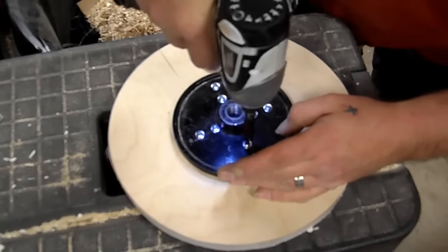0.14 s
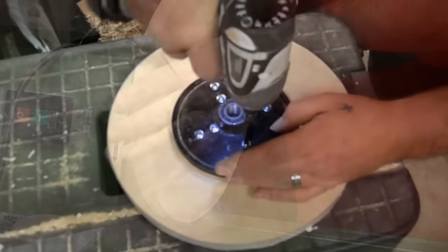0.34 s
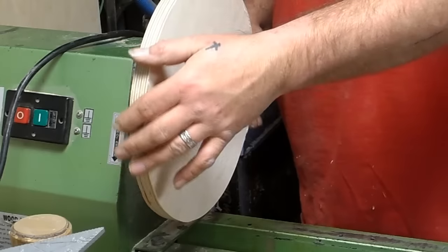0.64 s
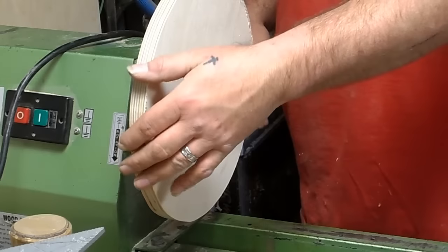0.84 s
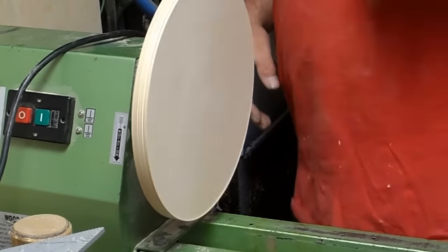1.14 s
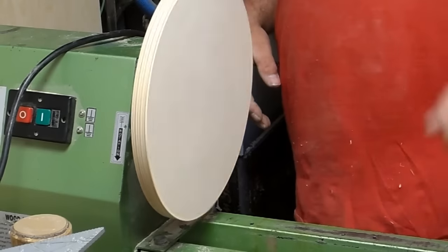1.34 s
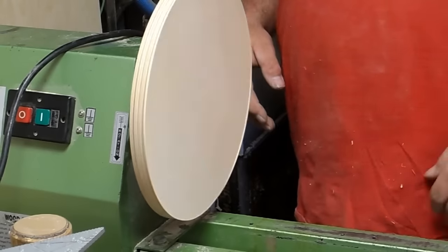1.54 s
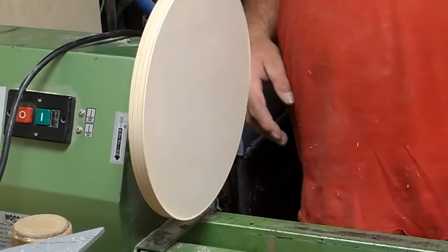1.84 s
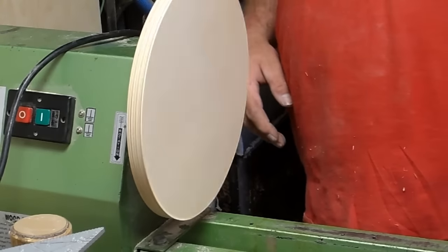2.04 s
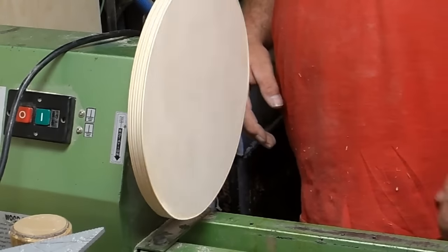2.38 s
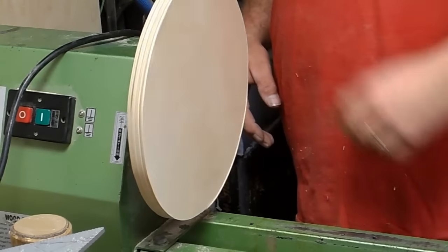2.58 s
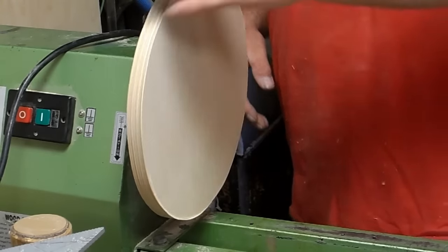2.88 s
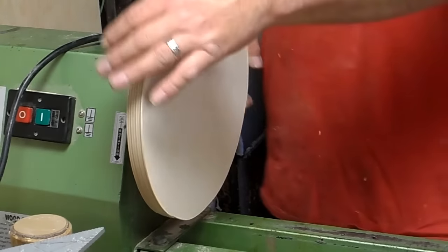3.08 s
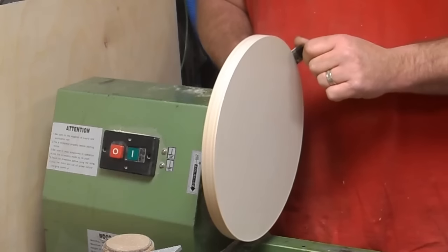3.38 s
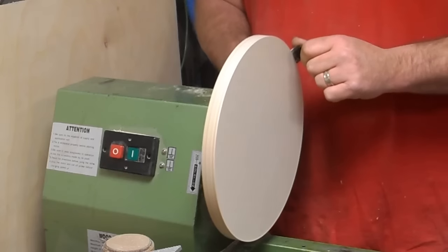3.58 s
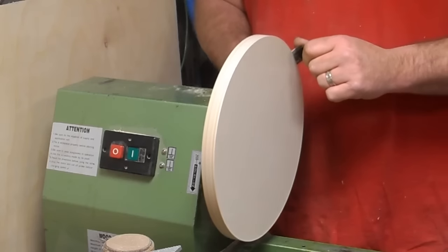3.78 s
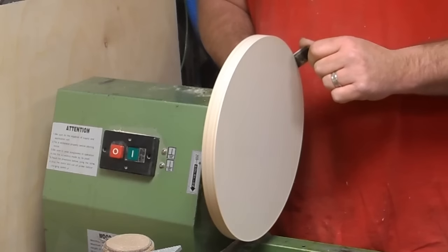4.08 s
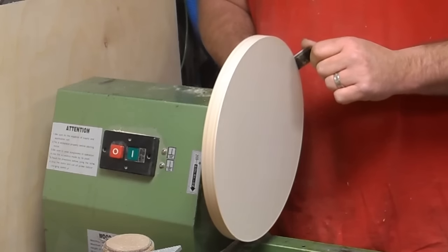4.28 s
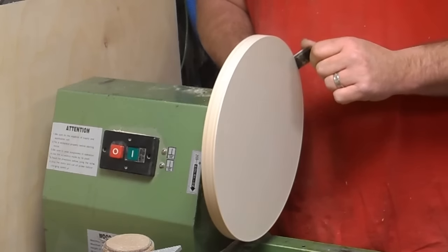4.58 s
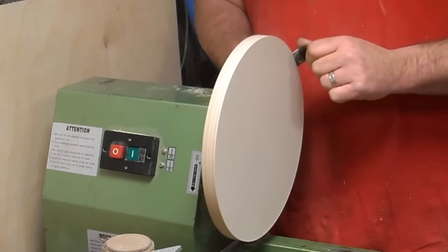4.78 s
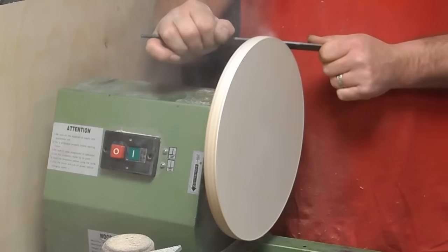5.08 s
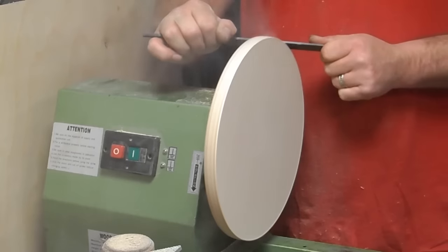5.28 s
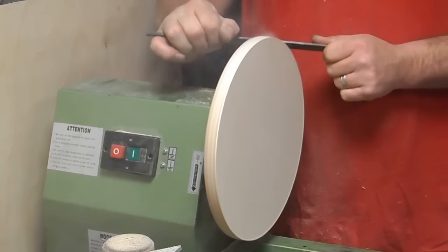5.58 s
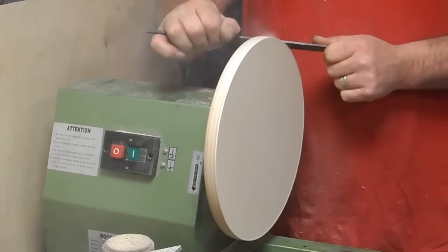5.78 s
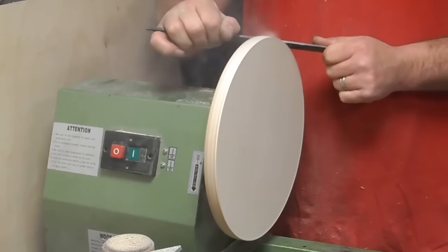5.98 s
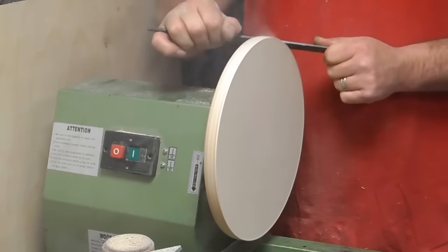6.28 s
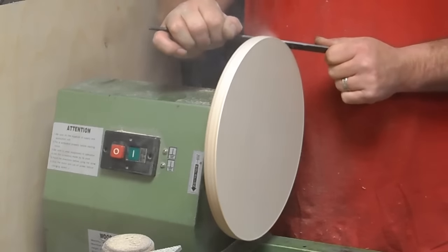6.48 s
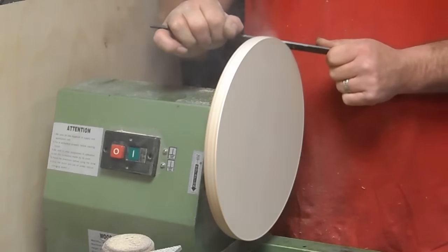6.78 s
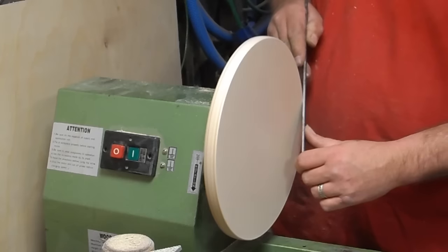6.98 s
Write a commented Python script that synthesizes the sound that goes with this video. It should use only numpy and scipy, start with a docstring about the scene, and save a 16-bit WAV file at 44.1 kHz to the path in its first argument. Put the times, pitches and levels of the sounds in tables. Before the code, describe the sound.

Last ratchety drill clicks, soft rumbling hand-spun plywood disc with bearing knocks, then three abrupt passages of harsh metal file rasping its spinning edge.

```python
"""Over room tone, a cordless drill runs down through its last clutch clicks: fading noise, bursts and a ringing chuck.
A hand then spins a plywood disc on a lathe: lumpy noise rings the frame, with bearing knocks and palm rubs.
Three passages of the powered disc follow, a file behind its rim, on top, then in front: the rim's bumps return
every turn, so the rasp is a comb of shaft orders that rings the disc, under fresh hiss from the file teeth."""
import sys
import numpy as np
from scipy import signal
from scipy.io import wavfile
from scipy.ndimage import uniform_filter1d

SR = 44100
rng = np.random.default_rng(int(sys.argv[2]) if len(sys.argv) > 2 else 0)


def field_ratio(decibels):
    """Amplitude ratio for a level in dB (20 dB per decade); scalars and array-likes work."""
    return 10 ** (np.asarray(decibels, dtype=float) / 20)


def int16_out(signal):
    """Quantize to a 16-bit WAV file."""
    q = np.round(np.clip(np.atleast_2d(signal).T, -1, 1) * 32767)
    wavfile.write(sys.argv[1], SR, q.astype(np.int16))


N = 314433
T = np.arange(N) / SR

# Spectra below give relative level per Hz; "per passage" lists hold behind, on top, in front.
# room tone spectrum [f/Hz, level/dB]
ROOM_SPECTRUM = [(12, -36), (20, 0.5), (59, -6.5), (145, -22.5), (203, -19.5), (375, -29.5), (1650, -36.5),
                 (3800, -41), (13000, -42.5), (15800, -45)]
ROOM_DB = -66.5
# room tone above the bass [t/s, level/dB]
ROOM_LEVEL = [(0, 6), (.256, -1), (.27, 4), (7.13, 0.5)]

# drill brush hiss, also the colour of the click cracks [f/Hz, level/dB]
DRILL_AIR = [(1180, -22), (2000, -24), (2160, -11), (4140, -8.5), (5950, -17), (13300, -8), (15800, -14)]
# drill housing buzz, also the colour of the click thumps [f/Hz, level/dB]
DRILL_BODY = [(40, -37), (95, 4.5), (200, -21), (440, -2), (800, -15.5), (1450, -12.5), (2500, -15.5),
              (4000, -40)]
# clutch clicks and small ticks [t/s, crack level/dB, housing thump level/dB]
CLICKS = [(0.0059, -26, -47), (0.0314, -31, -50), (0.0474, -38, -42), (0.0504, -28, -33.5),
          (0.059, -27, -48), (0.0856, -35, -42.5), (0.109, -39, -53), (0.182, -53, -75), (0.2452, -49, -62),
          (0.2665, -40.5, -58)]
# chuck metal that rings at each click [f/Hz, width/Hz, level/dB]
CHUCK = [(1660, 90, 5), (2100, 130, -2), (3680, 130, -3), (4996, 90, -8)]
CHUCK_OVER_CRACK_DB = 14
HISS_DB, HISS_HOLD_S, HISS_FADE_DB_PER_S = -44.5, 0.064, 245
BUZZ_DB, BUZZ_HOLD_S, BUZZ_FADE_DB_PER_S = -49, 0.054, 190

# spins by hand: start, stop, rise, bearing rumble, grit, release
# [t/s, t/s, t/s, level/dB, level/dB, slope/(dB/s)]
SPINS = [(0.253, 0.437, 0.031, -50, -65, 95), (1.17, 2.495, 0.027, -41, -49.5, 214)]
# lathe frame resonances [f/Hz, width/Hz, level/dB]
FRAME = [(140, 19, -14), (195, 12, 4.5), (226, 48, 1), (270, 66, -4), (349, 50, -15), (403, 104, -14.5)]
# bearing grit spectrum [f/Hz, level/dB]
GRIT = [(260, -32), (450, -9), (554, 3), (683, 2), (898, -9.5), (1420, -12.5), (2260, -24), (2630, -24),
        (3210, -23.5), (3910, -26.5), (5320, -29), (6200, -38), (8060, -75)]
# bearing whirr resonances [f/Hz, width/Hz, level/dB]
WHIRR = [(2570, 110, -1.5), (2754, 120, -1), (4100, 120, -6)]
WHIRR_OVER_GRIT_DB = -18
COAST_DB_PER_S = 6.5  # the coasting disc quietens
WOBBLE_DB, WOBBLE_HZ, WOBBLE_TOP_S = 2.5, 6.4, 1.46  # the rumble swells and sinks
LINGER_DB, GRIT_LINGER_DB, LINGER_DB_PER_S = -6.5, -10.5, 48  # left after the stop
GRIT_STOPS_EARLY_S = 0.053
BRAKE_S, BRAKE_LENGTH_S, BRAKE_RUMBLE_DB, BRAKE_GRIT_DB = 2.47, 0.12, 9, 4  # the hand grips the disc
TICK_S, TICK_DB, TICK_HZ, TICK_T60_S = 0.267, -41.5, 2650, 0.0051
# bearing knocks, timed half a rise after first touch [t/s, level/dB before the swell's scale, f/Hz]
KNOCKS = [(1.18, -30, 276), (1.456, -26, 198), (1.482, -29, 250), (1.515, -25, 254), (1.583, -32, 222),
          (1.747, -29.5, 208), (2.322, -30, 218), (2.455, -25.5, 224), (2.479, -22, 200)]
KNOCK_RISE_S = 0.007  # from first touch to the top of the swing
# palm strokes on the rim: peak, hiss, disc ringing, rise, fall [t/s, level/dB, level/dB, t/s, t/s]
BRUSHES = [(1.252, -43, -47, 0.016, 0.0071), (1.272, -42.5, -65, .006, 0.017),
           (1.361, -52, -45.5, 0.0061, 0.018), (1.75, -58, -63, .012, 0.019), (2.425, -58, -72, .01, 0.014)]
# palm hiss spectrum [f/Hz, level/dB]
BRUSH = [(350, -1), (600, 13.5), (634, -41), (943, -12.5), (1130, -28), (3970, -12), (4310, -17),
         (15800, -18)]
RING_S, RING_DB, RING_DB_PER_S = 2.47, -51, 39.5  # the frame's lowest strong mode lingers

# edges of the filing passages [t/s]
PASSAGE_EDGES = [3.134, 4.802, 6.805, 7.13]
# disc speed per passage [turns/s]
TURNS_PER_S = [22.596, 23.965, 24.727]
# how hard the file is pushed [t/s, level/dB]
PUSH = [(3.14, -0.5), (3.4, -1), (3.65, 3), (4.15, 2), (4.4, 0), (4.8, 0), (4.81, 0.5), (5.45, 1),
        (6.0, -2.5), (6.25, 1), (6.45, 0.5), (6.8, 0), (7.13, 1)]
# per passage, rows hum, cutting, whine, ring [start level/dB, drift/(dB/s), share of push followed]
LAYERS = [
    [(-41.5, 0, 0.15), (-34, 0.8, -0.42), (-34, -1, 0.64), (-34.5, 0.5, 0.014)],
    [(-42.5, 1.5, 0.38), (-36, -1, 0.66), (-37.5, 1.5, 0.69), (-32.5, 0.5, 0.7)],
    [(-42.5, -20, 0), (-40.5, -18.5, 0), (-46, 4, 0), (-41, -6, 0)],
]
# the hum starts louder and settles, per passage [level/dB]
HUM_SURGE_DB = [0, 9, 3]
HUM_SURGE_S = 0.35
# treble hiss of the file teeth [t/s, level/dB]
FILE_HISS = [(3.14, -38.5), (4.2, -40.5), (4.4, -37), (4.8, -38.5), (4.803, -53), (5.45, -50),
             (5.65, -52.5), (6.05, -53), (6.25, -49.5), (6.804, -54), (6.806, -41), (7.13, -41)]
# the roar throbs once a turn [t/s, depth/dB]
THROB = [(3.14, 0.38), (3.7, 1.1), (3.85, 3.6), (4.1, 2.3), (4.25, 0.42), (4.5, 0.27), (4.65, 1.4),
         (4.8, 1.5), (4.81, 0.47), (6.15, 0.39), (6.33, 3.6), (6.8, 1.9)]
# where the throb tops, per passage [turns]
THROB_TOP_TURNS = [0.95, 0.44, 0]
# file pressure round the rim, one table a passage [position/turns, level/dB]
PRESSURE = [
    [(0, -9), (.09, -2), (.16, -3.5), (.33, 0.5), (.45, -4), (.62, 1), (.9, -5), (1, 7)],
    [(0, -14), (.04, -2), (.14, -4), (.28, -5.5), (.45, -6.5), (.6, -4.5), (.72, -10), (.88, -9), (1, -4)],
    [(0, -13), (.12, -7), (.37, -3.5), (.62, -8), (.82, -4), (.93, -3.5), (1, -12)],
]
PRESSURE_LEAD_TURNS = 0.089
# power of the pressure that the rasp follows, per passage [exponent]
RASP_FOLLOWS = [0.3, 0.92, 0.96]
# power of the pressure that the shaft orders follow, per passage [exponent]
ORDERS_FOLLOW = [0.12, 0.35, 0.15]
# that power changes with the push, per passage [exponent/dB]
DEEPER_PER_DB = [0.14, -0.03, 2.3]

# disc modes, widths before damping, levels over the rasp with the file behind / on top or in front
# [f/Hz, width/Hz, level/dB, level/dB]
DISC = [(536, 430, 8.5, 10), (820.4, 12.6, 21.5, 11), (978, 135, -1, 14), (1419, 180, 8, 10.5),
        (1840, 60, 8.5, 17.5), (2133, 25, -13, 21), (2282, 56, 6.5, 21), (2570, 37, -1, 23),
        (3030, 117, 23.5, 34), (3238, 42, 23, 40), (3800, 98, 11, 18), (4050, 43, 11.5, 18.5),
        (4840, 160, 2, 5.5), (6020, 14, 10, -15), (8330, 62, 5, 6), (11700, 160, 2, 4)]
# the file's contact scales the widths of the disc modes, per passage [factor]
DAMPING = [0.6, 1.1, 0.8]
# rasp between the modes, one table a passage [f/Hz, level/dB]
RASP = [
    [(59, 2), (100, -11), (228, 1.5), (797, -7), (1220, -5.5), (1410, -1.5), (1600, -5.5), (6770, -23.5),
     (12000, -21.5), (15800, -20.5)],
    [(59, -66), (100, -7), (189, -0.5), (388, -12), (780, -0.5), (944, -15.5), (1980, -13.5), (2250, -5.5),
     (2720, -23.5), (15800, -25.5)],
    [(59, -63), (100, -15), (197, -2), (388, -12.5), (814, -11.5), (1100, -20), (2400, -15), (2780, -25),
     (3160, -26.5), (11000, -6.5), (15800, -10.5)],
]
# share of the rasp's power in grain that comes back next turn [f/Hz, then one share a passage]
RETURNS = [(285, 0.99, 0.84, 0.14), (1300, 0.89, 1, 0.67), (2300, 0.78, 1, 0.76), (4600, 0.1, 0.04, 0.056),
           (12000, 0.031, 0.029, 0.071)]

# lasting shape of the rim: strong shaft orders, one list a passage [order]
STRONG = [
    [6, 8, 10, 11, 12, 13, 17, 19, 20, 21, 22, 24, 26, 30, 31, 35, 36, 60, 62, 64, 65],
    [8, 9, 10, 22, 24, 25, 27, 29, 32, 33, 34, 36, 38],
    [8, 9, 10, 12, 21, 22, 32, 33, 34],
]
# their levels [level/dB]
STRONG_DB = [
    [-5.5, -9, -1.5, -5.5, -1.5, 2, 0.5, 1, 2, -6.5, -1, -0.5, -7, 4.5, 3, -2, 3, -6, 3, 2, -5],
    [4.5, -1.5, -18, 1, -4.5, -5.5, 0.5, -7, 7.5, 5.5, 1, -3, -4.5],
    [-3, -11, -12, -2, -4, -12, -0.5, 3.5, 0.5],
]
# the other orders, per passage [level/dB]
WEAK_DB = [-10, -13.5, -25]
WEAK_SCATTER_DB, WEAK_FROM, WEAK_TO, TOP_ORDER = 3, 9, 46, 65
# how loosely the rim's bumps bunch, per passage [radians from order to order]
SPREAD = [1.31, 0.91, 1.51]
# where round the rim the bumps bunch, per passage [turns]
BUMPS_LATE_TURNS = [0.85, 0.33, 0.4]
# how far the orders waver in size, per passage [share, reached at order 20]
WAVER = [0.45, 0.22, 0.5]
# orders that change as the file shifts on the rim, one list a passage [order]
SHIFTED = [
    [10, 11, 23, 25, 26, 28, 30, 31, 35, 36],
    [32, 34, 35, 36, 37, 38],
    [],
]
# their change [level/dB]
SHIFT_DB = [
    [4, 3.5, 14, 10, 6, 9, -0.5, -9, 11, 0],
    [-3, 1, 13, 9, 5, 2],
    [],
]
# the shift begins, is complete, starts back, is back [t/s, t/s, t/s, t/s]
SHIFT_S = [(3.52, 3.62, 3.91, 4.17), (6.3, 6.6, 6.8, 8.4)]
SINGING_DB, SINGING_ENDS_S, SINGING_FADE_DB_PER_S = -3.5, 4.35, 20  # top orders, until the file eases

# with the file on top it catches once a turn at a drifting place [t/s, lateness/turns, level/dB over rasp]
BITE = [(4.8, .07, 6), (5.0, .06, -1.5), (5.3, .13, -2), (5.55, 0.09, 0.5), (5.65, 0.14, -3.5),
        (6.0, 0.14, -8), (6.27, 0.23, -3), (6.29, 0.0015, -3.5), (6.8, 0.0075, -2.5)]
# catches placed singly, each with its own time and level [t/s, level/dB over rasp]
PLACED = [(4.8497, 5.5), (4.8906, 1.5), (5.014, 3.5), (5.2646, 2), (5.391, 2), (5.4743, 3), (5.5162, 3),
          (5.599, 4), (5.7256, 0.5), (5.8528, 2), (5.9764, 1), (6.3044, -3.5), (6.3463, -4), (6.6367, 0.5),
          (6.6806, 2), (6.722, -0.5)]
CATCH_SCATTER_DB, CATCH_JITTER_TURNS = 0.1, 0.0049
KNOCK_OVER_DB, KNOCK_SPREAD_S = 27, 0.0019  # a catch is a short scrunch rather than one point
CLANG_HZ, CLANG_WIDTH_HZ, CLANG_DB = 2240, 150, 2.5  # region of the spectrum that a catch lifts
# the file's grip on top damps other modes [t/s, near 2.2 kHz level/dB, near 3.2 kHz level/dB, above level/dB]
FILE_GRIP = [(4.81, -1.5, 1.5, -0.5), (5.0, 1, 7, 5.5), (5.3, 1, 4.5, 3), (5.5, -2, 2, 2), (5.68, 1, 2, 4),
             (5.75, 5, 8.5, 6), (5.87, 2, 4.5, 2.5), (6.1, 4, 3.5, 2.5), (6.35, 2, 1.5, 2.5),
             (6.58, 1.5, 1.5, 0), (6.8, 0.5, 1, 2.5)]
# power of the pressure that the choked ring follows, per grip band [exponent]
RING_FOLLOWS = [0.7, 0.6, 0.65]

CEILING_DB = -14.5  # the input stage rounds off peaks
EDGE_HZ = 15830


def evened(x):
    """Scales to rms 1."""
    return x / np.sqrt(np.mean(x ** 2) + 1e-20)


def read(points, hz, column=1):
    """Reads a table on a log-frequency axis."""
    table = np.transpose(points)
    return np.interp(np.log(hz + 1), np.log(table[0] + 1), table[column])


def spectrum(points):
    """Magnitude curve of a dB table."""
    return lambda f: field_ratio(read(points, f))


def peak(f, hz, width):
    """Power curve of a resonance, 1 at its centre."""
    return 1 / (1 + (2 * (f - hz) / width) ** 2)


def modes(table):
    """Magnitude of a body with steep resonances."""
    return lambda f: np.sqrt(sum(field_ratio(2 * db) * peak(f, hz, width) ** 2 for hz, width, db in table))


def band(lo_hz, hi_hz):
    """Magnitude of a steep band-pass."""
    return lambda f: 1 / np.sqrt((1 + (f / hi_hz) ** 12) * (1 + (lo_hz / (f + 1)) ** 12))


def coloured(x, gain):
    """Filters by the causal minimum-phase filter with the magnitude gain(Hz)."""
    log = np.log(np.maximum(gain(abs(np.fft.fftfreq(8192, 1 / SR))), 1e-5))
    taps = np.fft.ifft(np.exp(log - 1j * signal.hilbert(log).imag)).real[:4096]
    return signal.oaconvolve(x, taps)[:len(x)]


def noise(gain, size=N):
    """Coloured noise of rms 1."""
    return evened(coloured(rng.standard_normal(size), gain))


def patchy(x, patchy_db, frames, bins):
    """Each region of the spectrum swells and sinks on its own as the contact wanders."""
    z = signal.stft(x, nperseg=512)[2]
    patches = uniform_filter1d(rng.standard_normal(z.shape), round(bins), 0)
    patches = uniform_filter1d(patches, round(frames), 1)
    return signal.istft(z * field_ratio(patchy_db * evened(patches)), nperseg=512)[1][:len(x)]


def level(rows, column):
    """A dB column as a gain over time, silent outside its rows."""
    table = np.transpose(rows)
    return field_ratio(np.interp(T, table[0], table[column], left=-200, right=-200))


def fade(start_s, db_per_s):
    """Gain 1 until start_s, then a straight fall in dB."""
    return field_ratio(-db_per_s * np.maximum(T - start_s, 0))


def train(times, gains):
    """Single-sample blows."""
    out = np.zeros(N)
    out[np.round(np.multiply(times, SR)).astype(int)] = gains
    return out


def room():
    """Room tone and microphone noise; the deep bass never stops."""
    tone = field_ratio(ROOM_DB) * noise(spectrum(ROOM_SPECTRUM))
    deep = coloured(tone, lambda f: 1 / np.sqrt(1 + (f / 90) ** 4))
    return deep + (tone - deep) * level(ROOM_LEVEL, 1)


def drill():
    """Brush hiss and housing buzz die away; each click is a noise crack, a chuck ring and a housing thump."""
    s, crack_db, thump_db = np.transpose(CLICKS)
    snap = (1 - np.exp(-T[:2000] / 0.00036)) * field_ratio(-60 * T[:2000] / 0.012)
    crack = np.convolve(train(s, field_ratio(crack_db)), snap)[:N]
    chuck_ring = coloured(train(s, field_ratio(crack_db + CHUCK_OVER_CRACK_DB)), modes(CHUCK))
    thump = np.convolve(train(s, field_ratio(thump_db)), field_ratio(-60 * T[:4000] / 0.07))[:N]
    hiss = field_ratio(HISS_DB) * fade(HISS_HOLD_S, HISS_FADE_DB_PER_S)
    buzz = field_ratio(BUZZ_DB) * fade(BUZZ_HOLD_S, BUZZ_FADE_DB_PER_S)
    return noise(spectrum(DRILL_AIR)) * (hiss + crack) + noise(spectrum(DRILL_BODY)) * (buzz + thump) + chuck_ring


def spin_levels():
    """Gains of rumble and grit: rise, slow coasting, a braking grip, release."""
    rumble, grit = np.zeros((2, N))
    brake = np.exp(-(2 * (T - BRAKE_S) / BRAKE_LENGTH_S) ** 2)
    wobble = field_ratio(WOBBLE_DB * np.cos(2 * np.pi * WOBBLE_HZ * (T - WOBBLE_TOP_S)))
    for start, stop, rise, rumble_db, grit_db, release_db in SPINS:
        slowing = field_ratio(-COAST_DB_PER_S * (np.clip(T, start, stop) - start))
        coast = np.clip((T - start) / rise, 0, 1) * slowing
        linger = fade(stop, LINGER_DB_PER_S)
        rumble_end = np.maximum(fade(stop, release_db), field_ratio(LINGER_DB) * linger)
        grit_end = np.maximum(fade(stop - GRIT_STOPS_EARLY_S, release_db), field_ratio(GRIT_LINGER_DB) * linger)
        rumble += field_ratio(rumble_db) * coast * rumble_end
        grit += field_ratio(grit_db) * coast * grit_end
    return rumble * wobble * field_ratio(BRAKE_RUMBLE_DB * brake), grit * field_ratio(BRAKE_GRIT_DB * brake)


def hand_spin():
    """Lumpy bearing noise rings the lathe frame, under a patchy grit; the second spin adds a whirr."""
    lumps = field_ratio(0.7 * evened(uniform_filter1d(uniform_filter1d(rng.standard_normal(N), 500), 500)))
    rumble_gain, grit_gain = spin_levels()
    rumble = evened(coloured(rng.standard_normal(N) * lumps, modes(FRAME))) * rumble_gain
    grit = noise(spectrum(GRIT))
    whirr = field_ratio(WHIRR_OVER_GRIT_DB) * (T > SPINS[1][0]) * noise(modes(WHIRR))
    grit = patchy(grit + whirr, 3.2, 14, 2.4) * lumps ** 0.18 * grit_gain
    return (rumble + grit) * (T < PASSAGE_EDGES[0])


def hand_tick():
    """A dry tick, one short decaying sine, as the hand meets the disc."""
    t = T[:600]
    tick = field_ratio(-60 * t / TICK_T60_S) * np.sin(2 * np.pi * TICK_HZ * t)
    return np.convolve(train([TICK_S], field_ratio(TICK_DB)), tick)[:N]


def bearing_knocks():
    """Each knock is a short swing, a sine under a quick swell."""
    out = np.zeros(N)
    t = T[:4000]
    swell = 0.36 * (t / KNOCK_RISE_S * np.exp(1 - t / KNOCK_RISE_S)) ** 2
    for s, db, hz in KNOCKS:
        start = round((s - KNOCK_RISE_S / 2) * SR)
        out[start:][:4000] += field_ratio(db) * swell * np.sin(2 * np.pi * hz * t)
    return out


def palm_brushes():
    """The palm rubs the rim in short strokes: patchy hiss, and noise through the widened disc modes."""
    strokes = np.array([np.exp(-abs(T - s) / np.where(T < s, rise, fall)) for s, _, _, rise, fall in BRUSHES])
    strokes = strokes * (T >= SPINS[1][0])
    rubs, rings = field_ratio(np.transpose(BRUSHES)[1:3]) @ strokes
    held = [(hz, 7.9 * width + 60, -3.5 * np.log2(hz / 2000)) for hz, width, *_ in DISC if hz > 1500]
    wood = noise(modes(held))
    return rings * wood + rubs * patchy(noise(spectrum(BRUSH)), 3.5, 3.4, 8)


def frame_ring():
    """After the braking grip the frame's lowest strong mode lingers as narrow noise."""
    gate = (T > RING_S) * (T < PASSAGE_EDGES[0])
    return noise(modes(FRAME[1:2])) * field_ratio(RING_DB) * fade(RING_S, RING_DB_PER_S) * gate


def catches():
    """Times and dB of the catches: one a turn with scatter, those placed singly replacing their turn's."""
    at, late, db = np.transpose(BITE)
    starts = np.arange(PASSAGE_EDGES[1], PASSAGE_EDGES[2], 1 / TURNS_PER_S[1])
    jitter, scatter = rng.standard_normal((len(starts), 2)).T
    s = starts + (np.interp(starts, at, late) + CATCH_JITTER_TURNS * jitter) / TURNS_PER_S[1]
    catch_db = np.interp(s, at, db) + CATCH_SCATTER_DB * scatter
    for placed_s, placed_db in PLACED:
        nearest = np.argmin(abs(s - placed_s))
        s[nearest], catch_db[nearest] = placed_s, placed_db
    return s, catch_db


def disc_gain(passage):
    """Magnitude of the rasp's spectrum with the disc modes, reshaped by the file's damping."""
    damping, column = DAMPING[passage], 2 + (passage > 0)
    return lambda f: field_ratio(read(RASP[passage], f)) * np.sqrt(
        1 + sum(field_ratio(2 * m[column]) * peak(f, m[0], m[1] * damping) / damping for m in DISC))


def rim_grain(size, turn):
    """Fine grain of the rim, heard again each turn, that wears away over a few turns."""
    keep = 0.85
    fresh = rng.standard_normal((size // turn + 40, turn))  # one row a turn
    grain = signal.lfilter([np.sqrt(1 - keep ** 2)], [1, -keep], fresh, axis=0)
    return grain[-(size // turn + 1):].ravel()[:size]


def rasp(passage, grain, force):
    """Returning grain and noise new at every touch, both driven by the file's force, ring the disc."""
    disc = disc_gain(passage)
    share = lambda f: np.clip(read(RETURNS, f, column=1 + passage), 0, 1)
    returning = coloured(grain * force, lambda f: disc(f) * np.sqrt(share(f)))
    new = coloured(rng.standard_normal(len(grain)) * force, lambda f: disc(f) * np.sqrt(1 - share(f)))
    return returning + new


def rim_shape(passage, t, turn):
    """Wavering shaft orders (hum, middle, top), phased by bumps that bunch at one place on the rim."""
    order = np.arange(1, TOP_ORDER + 1)
    weak_db = WEAK_DB[passage] + WEAK_SCATTER_DB * rng.standard_normal(TOP_ORDER)
    order_db = np.where((order >= WEAK_FROM) & (order <= WEAK_TO), weak_db, -np.inf)
    order_db[np.subtract(STRONG[passage], 1)] = STRONG_DB[passage]
    loose = SPREAD[passage] * rng.standard_normal(TOP_ORDER)
    phase = np.cumsum(loose - 2 * np.pi * BUMPS_LATE_TURNS[passage])
    swing = field_ratio(order_db) * np.exp(1j * phase)
    # the waver is drawn in steps of 512 samples: real part mostly size, imaginary part mostly phase
    steps = t[::512]
    a, b = rng.standard_normal((2, TOP_ORDER, len(steps)))
    finer = np.sqrt(order / 20)[:, None]
    waver = 1 + WAVER[passage] * finer * evened(uniform_filter1d(a, 25, 1))
    waver = waver + 0.35j * finer * evened(uniform_filter1d(b, 25, 1))
    shift_db = np.zeros(TOP_ORDER)
    shift_db[np.array(SHIFTED[passage], int) - 1] = SHIFT_DB[passage]
    waver *= field_ratio(np.outer(shift_db, np.interp(steps, SHIFT_S[min(passage, 1)], [0, 1, 1, 0])))
    lines = []
    for s, w, k in zip(swing, waver, order):
        drift = np.interp(t, steps, w.real) + 1j * np.interp(t, steps, w.imag)
        lines.append((s * drift * np.exp(2j * np.pi * k * (t - t[0]) * SR / turn)).real)
    lines = np.array(lines)
    hum = order * TURNS_PER_S[passage] < 260
    middle = ~hum & (order <= WEAK_TO)
    return evened(lines[hum].sum(0)), evened(lines[middle].sum(0)), evened(lines[WEAK_TO:].sum(0))


def catch_knock(passage, blows):
    """A catch is also a short noisy knock that leaves the disc ringing."""
    disc = disc_gain(passage)
    clang = lambda f: 1 + field_ratio(2 * CLANG_DB) * peak(f, CLANG_HZ, CLANG_WIDTH_HZ)
    blunt = lambda f: disc(f) * np.sqrt(clang(f) / (1 + (f / 4600) ** 4))
    scrunch = np.exp(-T[:600] / KNOCK_SPREAD_S) * rng.standard_normal(600)
    knock = np.convolve(coloured(blows * field_ratio(KNOCK_OVER_DB), blunt), scrunch / np.linalg.norm(scrunch))
    return knock[:len(blows)] / np.linalg.norm(coloured(train([0], [1.])[:4096], blunt))


def choked_ring(passage, body, press, t):
    """Disc ring in three bands; with the file on top its grip colours it and chokes it between catches."""
    on_top = passage == 1
    at, *grip_db = np.transpose(FILE_GRIP)
    edges_hz = [1700, 2800, 3500, 5900]
    choke = uniform_filter1d(press, 90) ** on_top
    ring = np.zeros(len(t))
    for power, db, lo_hz, hi_hz in zip(RING_FOLLOWS, grip_db, edges_hz, edges_hz[1:]):
        grip = field_ratio(on_top * np.interp(t, at, db))
        ring += choke ** power * grip * coloured(body, band(lo_hz, hi_hz))
    return evened(ring)


def filing(passage):
    """File on the powered disc: shaft orders and rasp make hum, cutting, whine, ring and hiss."""
    on_top = passage == 1
    turn = round(SR / TURNS_PER_S[passage])
    lead = 2 * turn  # the disc is already ringing when the passage starts
    start, stop = PASSAGE_EDGES[passage:passage + 2]
    span = slice(round(start * SR) - lead, round(stop * SR))
    t = T[span]
    size, since, turns = len(t), t - start, np.arange(len(t)) / turn
    push_db = np.interp(t, *np.transpose(PUSH))
    hum, cut, whine, ring = (field_ratio(db + drift_db * since + share * push_db)
                             for db, drift_db, share in LAYERS[passage])
    hum = hum * field_ratio(HUM_SURGE_DB[passage] * np.exp(-since / HUM_SURGE_S))
    depth_db = (passage < 2) * np.interp(t, *np.transpose(THROB))
    throb = evened(field_ratio(depth_db * np.cos(2 * np.pi * (turns - THROB_TOP_TURNS[passage]))))
    cut, whine = cut * throb, whine * throb ** 0.62

    late = (np.interp(t, *np.transpose(BITE)[:2]) - PRESSURE_LEAD_TURNS) * on_top
    press = evened(field_ratio(np.interp((turns - late) % 1, *np.transpose(PRESSURE[passage]))))
    s, catch_db = catches()
    blows = train(s, field_ratio(catch_db) * on_top)
    jolt = (1 - np.exp(-T[:2000] / 0.00073)) * np.exp(-T[:2000] / 0.014)  # sudden grip, slower release
    press += np.convolve(blows, jolt)[span]

    grain, force = rim_grain(size, turn), press ** RASP_FOLLOWS[passage]
    body = rasp(passage, grain, force)
    body += catch_knock(passage, blows[span]) * np.std(body)
    body = patchy(body, [0.7, 1.1, 0.9][passage], 30, 5)
    # the file's fine modes come and go
    air = patchy(patchy(rasp(passage, grain, force), 1.0, 12, 4), 2.1, 60, 1.4)
    part = lambda x, lo_hz, hi_hz: evened(coloured(x, band(lo_hz, hi_hz)))

    low_orders, high_orders, top_orders = rim_shape(passage, t, turn)
    follow = np.maximum(ORDERS_FOLLOW[passage] + DEEPER_PER_DB[passage] * push_db, 0)
    high_orders = evened(patchy(high_orders * press ** follow, 0.55, 45, 2.4))
    singing = field_ratio(SINGING_DB) * top_orders * fade(SINGING_ENDS_S, SINGING_FADE_DB_PER_S)[span]

    sound = hum * (low_orders + field_ratio([-9, -12, -13][passage]) * part(body, 96, 285))
    sound += cut * (high_orders + field_ratio([-4.5, -7, -3][passage]) * part(body, 230, 1004))
    sound += whine * (singing + part(body, 1100, 1700))
    sound += level(FILE_HISS, 1)[span] * part(air, 5900, EDGE_HZ)
    sound += ring * choked_ring(passage, body, press, t)
    out = np.zeros(N)
    # the two tapers of the window share 3.9 ms
    out[span][lead:] = sound[lead:] * signal.windows.tukey(size - lead, 0.0039 / since[-1])
    return out


def scene():
    """All sources reach one microphone, heard alike in both channels."""
    mix = drill()
    mix += hand_spin() + hand_tick() + bearing_knocks() + palm_brushes() + frame_ring()
    mix += sum(filing(passage) for passage in range(3))
    mix += room()
    return np.array([mix, mix])


def top_cut(x):
    """Nothing passes above the cut-off."""
    return signal.sosfilt(signal.butter(12, 16630, fs=SR, output="sos"), x)


def record(dry):
    """Soft saturation of the input stage, then the band limit."""
    rounded = field_ratio(CEILING_DB) * np.tanh(dry / field_ratio(CEILING_DB))
    low_pass = signal.firwin(511, EDGE_HZ, window=("kaiser", 8), fs=SR)
    limited = signal.oaconvolve(rounded, low_pass[None], "same")
    return top_cut(limited)


dry = scene()
out = record(dry)
int16_out(out)
```